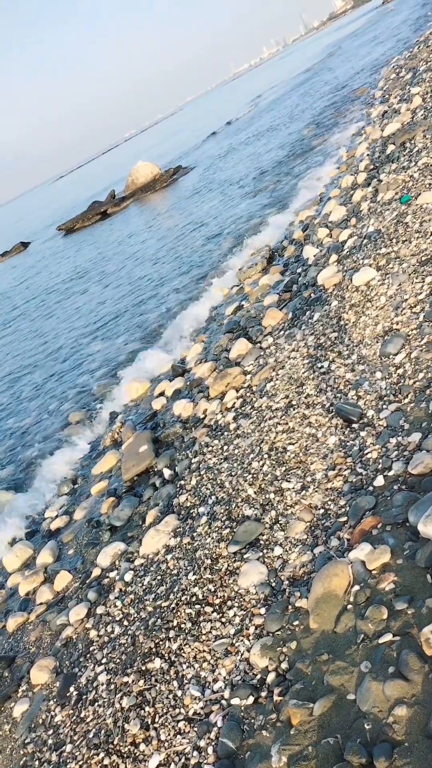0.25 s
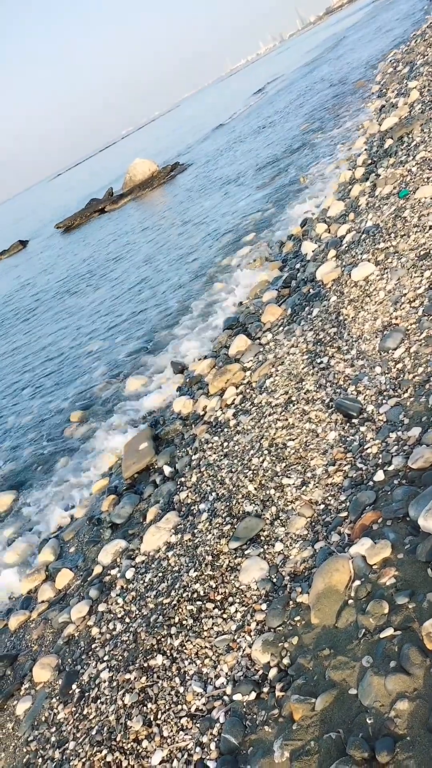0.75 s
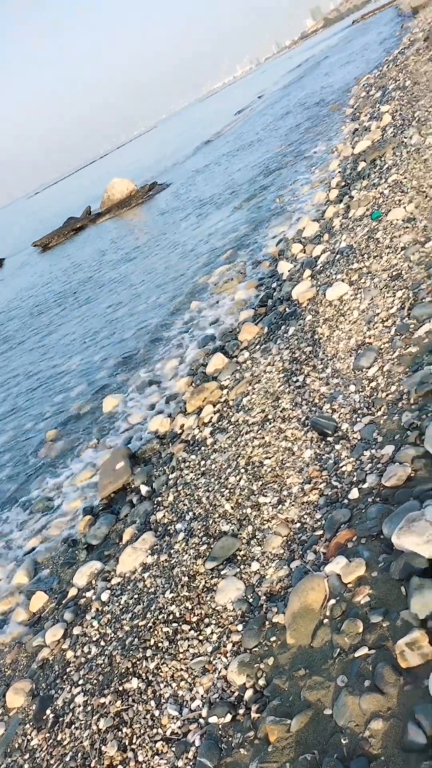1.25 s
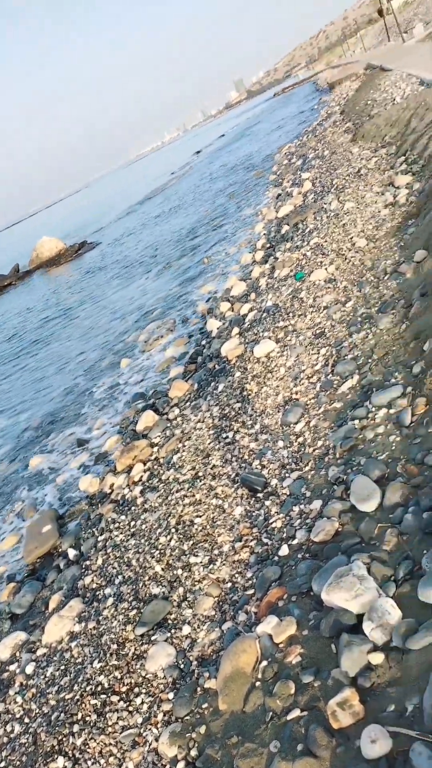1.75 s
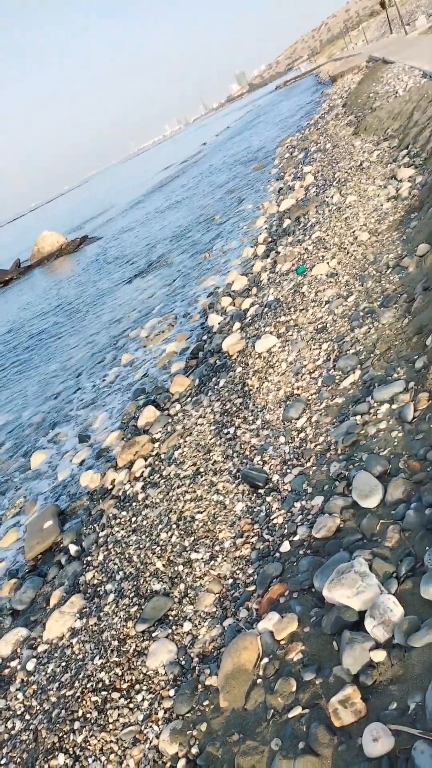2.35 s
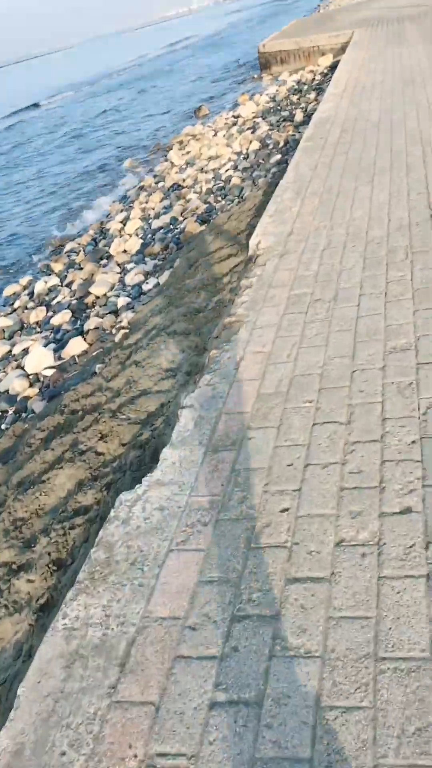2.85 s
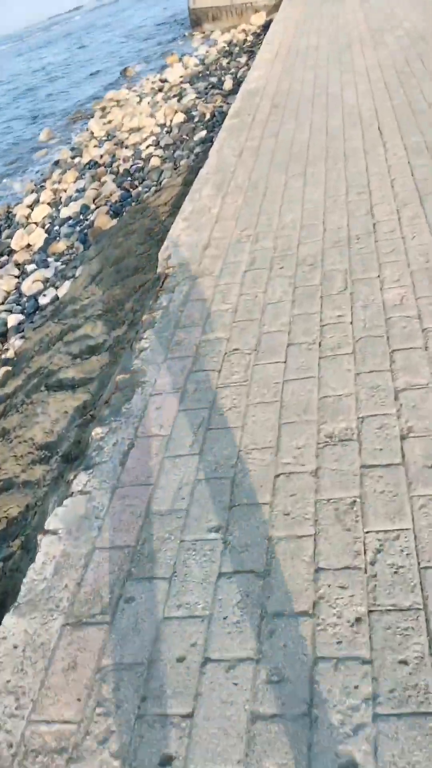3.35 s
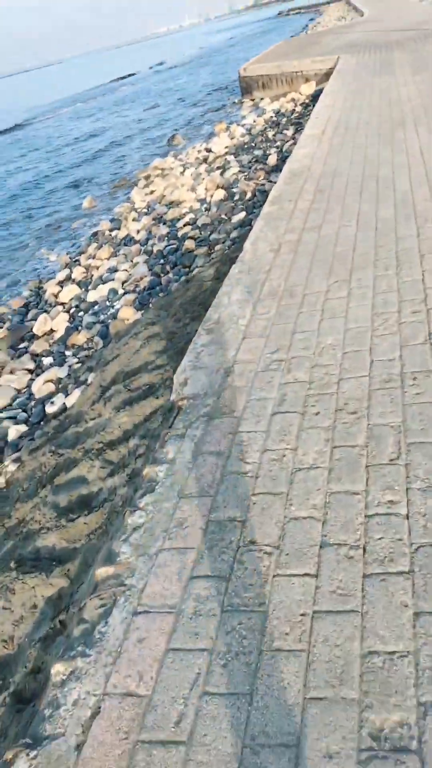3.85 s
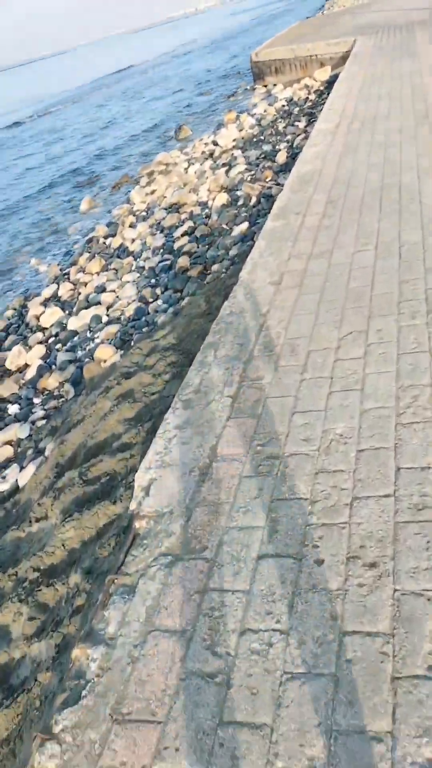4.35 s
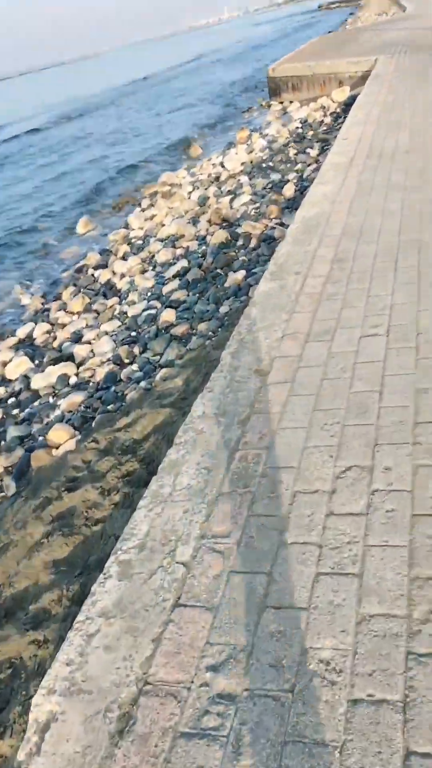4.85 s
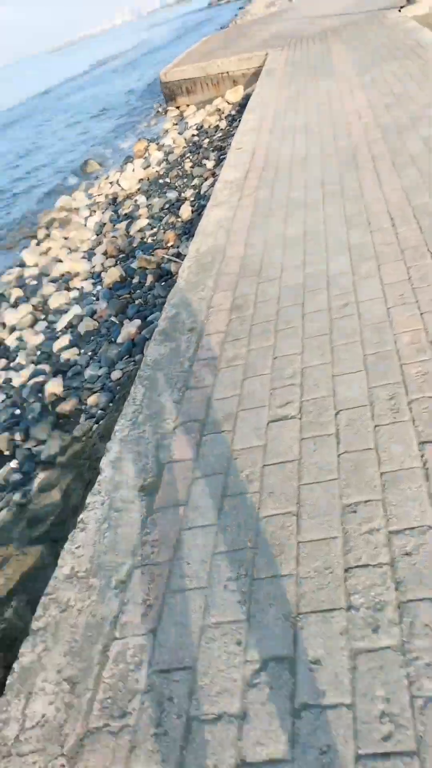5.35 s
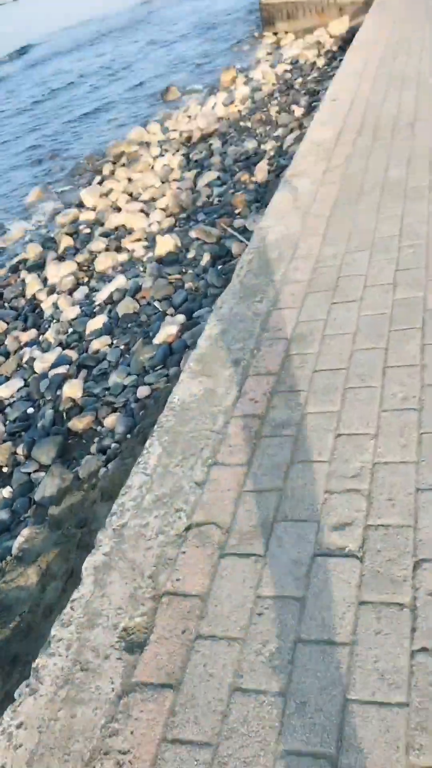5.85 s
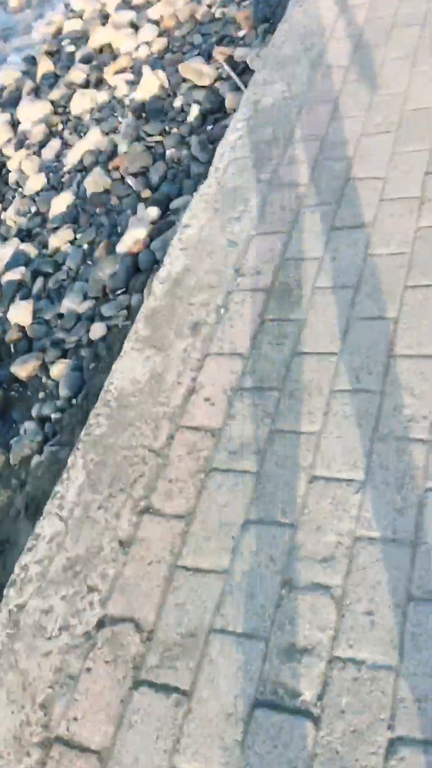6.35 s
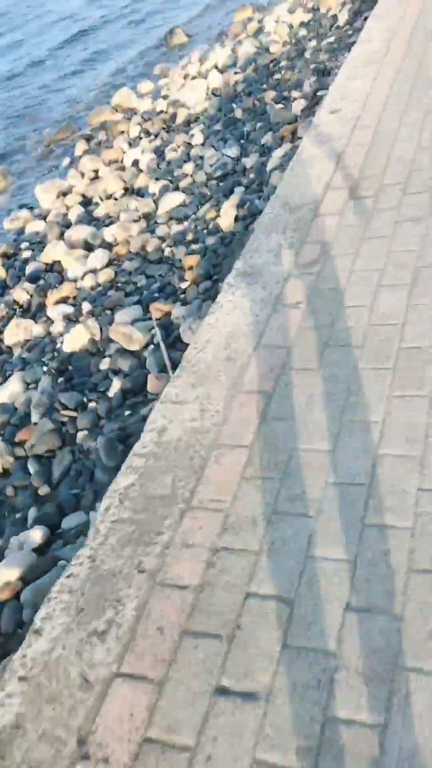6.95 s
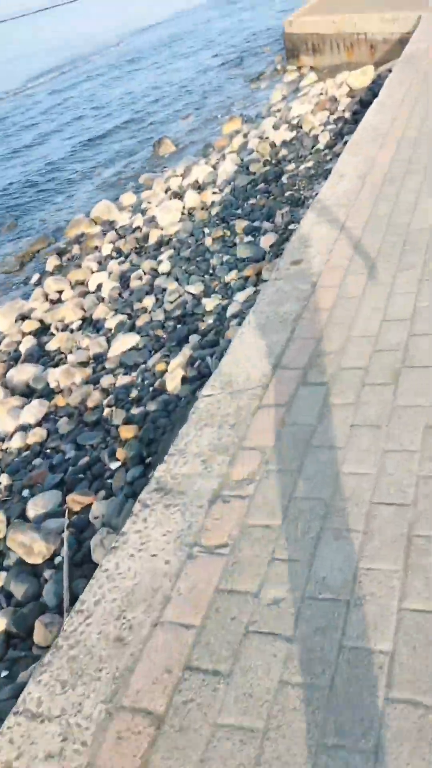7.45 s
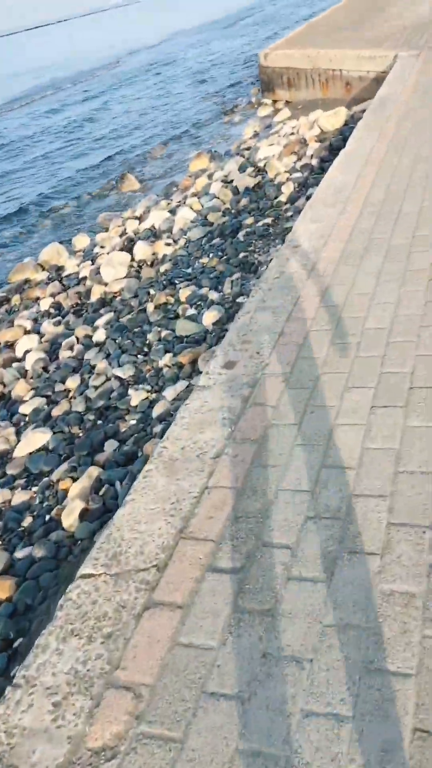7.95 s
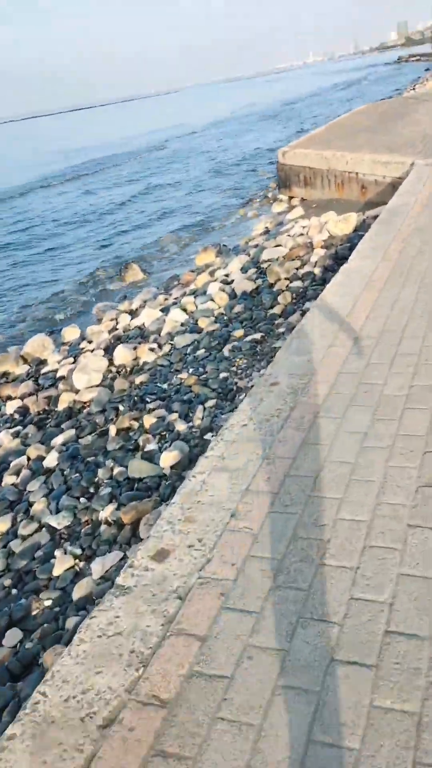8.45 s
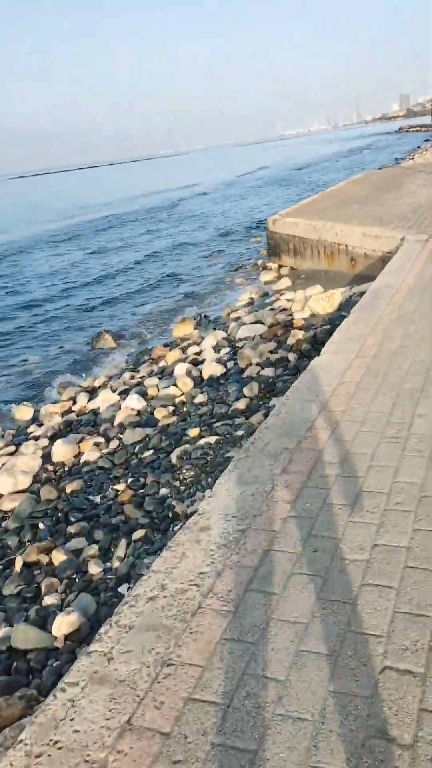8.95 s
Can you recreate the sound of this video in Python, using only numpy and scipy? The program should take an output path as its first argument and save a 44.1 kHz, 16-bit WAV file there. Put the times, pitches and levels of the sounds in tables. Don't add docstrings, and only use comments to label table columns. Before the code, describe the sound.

At 0 s a small wave breaks close by on pebbles, the loudest moment: wet slaps and hollow, rounded bubble tones tumble together under bright fizzing foam until about 0.7 s. It drains into thin trickling and isolated plops, almost quiet by 2 s. From 2.4 to 2.9 s there is abrupt total silence. Sound returns with a small gurgling wash, then light lapping, soft pebble knocks and sparse droplets from 3 to 5 s. Around 5.1 s bubbles pick up, and a fuller, moderate splash slaps and gurgles from 5.6 to 6.2 s. Faint dull footfalls come at 4.5, 6.0, 6.5, 7.4 and 8.5 s, with barely audible high metallic ticks, clearest near 7.1 s. Quiet lapping follows until 8.5 s, when bubbles, spray and slaps burst again, fading after 9.1 s. Low distant water rumble lies beneath; the pickup is dry, mono and open-air.

```python
import sys
import numpy as np
from scipy import signal
from scipy.fft import rfft, irfft, next_fast_len
from scipy.io import wavfile
from scipy.ndimage import uniform_filter1d, map_coordinates

SR = 44100
rng = np.random.default_rng(int(sys.argv[2]) if len(sys.argv) > 2 else 0)


def to_wav(sig):
    pcm = np.clip(np.atleast_2d(sig), -1, 1) * 32767
    pcm = np.round(pcm).astype(np.int16)
    wavfile.write(sys.argv[1], SR, pcm.T)


def ratio(d):
    e = np.asarray(d, float) / 20
    return 10 ** e


N = 405719

# start_s, level_db (peak), pitch_hz, life_cycles
FOOTFALLS = [
    (4.539, -45, 119, 1.7),
    (6.041, -48, 72.7, 2.3),
    (6.521, -40, 128, 2.4),
    (6.609, -40, 83.4, 1.7),
    (6.954, -48.5, 53.8, 1.5),
    (7.37, -45, 78.1, 2.1),
    (7.411, -40.5, 79.3, 2.9),
    (7.848, -50, 56.5, 1.7),
    (8.424, -38, 89.5, 2.1),
    (8.52, -37, 134, 5),
]
# start_s, level_db (peak), pitch_hz, fade_s (to -60 dB)
TAG_TICKS = [
    (0.5596, -61, 11670, 0.04),
    (4.5391, -59.5, 11650, 0.055),
    (4.5391, -70, 12330, .05),
    (5.5054, -58, 11660, 0.04),
    (6.534, -64, 10700, 0.04),
    (7.0815, -62, 15300, 0.04),
    (7.0863, -61, 8400, 0.03),
    (7.0863, -53, 13100, 0.03),
    (7.102, -65, 9700, .04),
    (8.9989, -58, 10300, 0.04),
]
# start_s, level_db (peak)
PEBBLE_KNOCKS = [
    (3.76, -48),
    (4.0785, -48),
    (4.2173, -46),
    (4.9136, -46),
    (7.1262, -40.5),
]
# start_s, level_db (peak)
DROPLET_BURSTS = [(3.2398, -47), (3.9242, -50), (4.912, -56), (5.3455, -52), (5.4947, -51), (5.5934, -48),
                  (5.9022, -42), (6.015, -42), (6.1761, -48), (6.894, -49), (7.547, -51), (7.6523, -52),
                  (8.627, -47), (8.6919, -41), (8.8141, -42), (8.909, -38)]
# start_s, length_s, pitch_hz, level_db
STREAMS = [(5.201, 0.17, 970, -48), (5.08, .1, 3000, -57), (6.42, .2, 877, -54), (6.1, .18, 950, -47.5),
           (8.38, .3, 4600, -59), (8.7, .28, 4650, -56), (2.93, .14, 2450, -47), (5.62, .1, 6450, -64),
           (6.1, .12, 5700, -63), (5.69, 0.24, 2500, -45), (5.72, 0.2, 1600, -49), (5.719, 0.1, 5460, -63),
           (6.05, 0.07, 1830, -50), (6.0, .12, 4000, -64), (5.982, 0.14, 5820, -59.5),
           (6.078, 0.12, 3950, -58), (5.86, .14, 588, -40.5), (7.518, 0.083, 1150, -55.5),
           (8.799, 0.15, 3950, -49), (5.7, .12, 6900, -63.5), (5.69, 0.11, 4050, -66),
           (6.03, .1, 2420, -59), (6.17, .12, 3750, -59.5), (8.85, .1, 2800, -49.5), (8.68, .2, 5800, -57),
           (6.04, 0.087, 2720, -52), (3.1, .1, 2250, -56), (3.09, .06, 1050, -50.5),
           (.24, .16, 3800, -43.5), (.05, .17, 3600, -36.5), (5.09, .3, 753, -52.5), (6.5, .07, 927, -52),
           (6.58, .11, 349, -50.5), (7.13, .13, 425, -52), (8.8, .1, 1150, -56.5), (.56, .1, 1500, -48.5)]
# start_s
# (7 ms before the crest), level_db (peak), pitch_hz
LONE_BUBBLES = [(0.384, -31.0, 280), (0.628, -40, 1120), (0.709, -41, 1010), (1.067, -49, 1060),
                (1.112, -49.0, 1080), (1.438, -52, 810), (1.533, -48, 300), (1.557, -55, 1290),
                (1.605, -53, 950), (1.691, -55, 960), (2.158, -54, 1250), (2.96, -36, 583), (3.04, -37, 970),
                (3.12, -44, 1080), (3.299, -46.0, 1160), (3.331, -42.0, 987), (3.521, -45.5, 790),
                (3.667, -45.0, 370), (3.894, -43.5, 220), (4.261, -41, 320), (5.101, -44.5, 340),
                (5.54, -45, 1240), (5.594, -40.5, 554), (5.696, -35, 780), (5.86, -33.0, 780),
                (6.037, -35.0, 800), (6.217, -39.5, 965), (6.468, -42, 340), (6.472, -45.0, 1270),
                (6.554, -39.0, 880), (6.646, -43, 300), (6.67, -46, 390), (6.827, -42, 800),
                (6.919, -48, 950), (7.019, -47.0, 990), (7.043, -48.0, 1160), (7.065, -50, 1140),
                (7.145, -45, 340), (7.209, -48.0, 1250), (7.414, -46, 1230), (8.117, -46.0, 1210),
                (8.216, -46.0, 220), (8.296, -45.0, 280), (8.326, -43.0, 1024), (8.407, -44, 1250),
                (8.558, -40, 500), (8.745, -32, 390), (8.883, -35.0, 1014), (8.913, -37, 560),
                (8.931, -36.0, 1020),
                (0.137, -30.0, 2200), (0.139, -28, 1490), (0.141, -32, 1870), (0.197, -37, 4310),
                  (0.27, -45, 6330), (0.292, -32, 1490), (0.298, -33.5, 3850), (0.364, -36.0, 2410),
                  (0.382, -39, 4090), (0.416, -37, 2130), (0.476, -42.0, 4240), (0.632, -44.0, 3940),
                  (1.194, -52.0, 3140), (2.322, -57.0, 3700), (2.394, -59, 2500), (2.918, -38.0, 2450),
                  (2.92, -41.0, 2970), (2.932, -51.0, 5170), (2.934, -51.0, 5450), (2.954, -41, 1920),
                  (2.96, -42.0, 2150), (2.972, -42.0, 3120), (2.972, -42, 1620), (2.976, -54.0, 6120),
                  (2.998, -39.0, 2930), (3.068, -39.0, 2520), (3.104, -40.0, 2730), (3.335, -59.0, 5510),
                  (3.455, -48.0, 2520), (3.93, -50, 1440), (5.303, -49.0, 2520), (5.62, -46, 1650),
                  (5.636, -56.0, 5990), (5.642, -55.0, 6440), (5.694, -53.0, 4760), (5.704, -45.0, 4050),
                  (5.758, -43.0, 3900), (6.139, -46, 4140), (6.199, -48.0, 4110), (6.353, -48, 1940),
                  (6.424, -51.0, 4110), (7.121, -50, 2090), (7.256, -49.0, 2890), (7.883, -65.0, 5810),
                  (8.158, -50.0, 2260), (8.552, -43, 2670), (8.655, -37.5, 1810), (8.657, -42.5, 3900),
                  (8.775, -39, 2520), (8.777, -37, 2070), (8.827, -39, 2020), (8.859, -48, 5920),
                  (8.905, -45.0, 4760), (8.913, -43, 3200), (8.969, -45.0, 4130)]
# start_s, level_db (peak), pitch_hz, life_cycles
WATER_SLAPS = [(.171, -16.5, 600, 2.5), (.145, -22, 1500, 2.7), (4.9135, -41, 1450, 9),
               (5.086, -36, 800, 5), (5.106, -39, 340, 3), (5.701, -30, 400, 3), (5.73, -23, 830, 5),
               (5.746, -31, 900, 3.3), (5.814, -28, 480, 4), (5.891, -24, 605, 3.7), (5.957, -27, 750, 4.3),
               (6.026, -32, 850, 3), (8.68, -31, 600, 3.4), (8.726, -31, 900, 2.3), (8.779, -29, 1500, 2.5),
               (8.793, -31, 500, 2.5), (8.915, -28, 1210, 2.5), (8.932, -29, 1400, 3),
               (8.999, -32, 700, 2.5), (9.038, -30, 600, 3), (3.936, -49, 1400, 5.5), (4.083, -49, 1600, 8)]
# start_s (7 ms before the crest), level_db
# (peak), pitch_hz
AIR_POCKETS = [(0.102, -20.5, 400), (0.108, -20.3, 620), (0.126, -24, 302), (0.132, -22.5, 667),
               (0.163, -21.5, 396), (0.226, -14, 528), (0.226, -15, 676), (0.329, -23, 570),
               (0.395, -29, 706), (1.623, -48.5, 678), (2.934, -37, 355), (2.958, -36, 570),
               (2.983, -32.6, 320), (2.985, -42, 624), (3.006, -32, 348), (3.026, -33, 322),
               (5.133, -37.5, 366), (5.27, -32.8, 216), (5.355, -37, 652), (5.684, -33, 330),
               (5.809, -29.5, 560), (5.887, -26, 557), (5.925, -27.5, 397), (5.94, -27, 686),
               (7.185, -39, 430), (7.417, -41.5, 150), (8.676, -26, 280), (8.691, -30.5, 559),
               (8.745, -31.3, 398), (8.774, -31, 370), (9.033, -34, 735),
               (0.058, -26, 1890), (0.09, -24.1, 1496), (0.11, -21, 910), (0.128, -28, 3746),
                 (0.134, -25, 1050), (0.139, -34, 2690), (0.218, -27.5, 3660), (2.934, -39, 3720),
                 (2.945, -40, 1410), (2.959, -32, 2540), (2.999, -45, 980), (3.039, -35, 968),
                 (4.909, -48, 1841), (4.911, -38.5, 1421), (5.083, -37, 840), (5.289, -32, 840),
                 (5.369, -36, 966), (5.635, -34, 3940), (5.727, -28.5, 830), (6.075, -40.5, 1765),
                 (6.099, -39, 1800), (6.554, -37, 893), (6.595, -39, 1410), (8.556, -28.5, 1754),
                 (8.571, -32, 1033), (8.634, -37, 2750), (8.808, -36, 3811), (8.868, -38, 4123),
                 (8.926, -33, 1730), (8.948, -32, 1020),
               (1.409, -45, 236), (4.263, -42, 336), (4.692, -42.5, 298), (5.135, -38.5, 980),
                (5.422, -38, 222), (5.652, -33, 835), (6.378, -38, 260), (6.466, -43, 345),
                (7.046, -39, 322), (7.223, -38.5, 980), (8.511, -32.5, 283), (.2, -25.5, 193),
                (.384, -34.5, 273)]
# start_s, hold_s, level_db, brightness_db_per_octave, extra_middle_ring_db
BREAKERS = [(0.019, 0.199, -32.0, 0.25, -0.5), (0.129, 0.04, -41.0, -1.24, -1),
            (0.326, 0.034, -36, -1.16, -3), (0.407, 0.023, -52.5, 1.0, 0.0), (0.526, 0.153, -49, 2, 2.5),
            (2.917, 0.093, -41, -0.55, -2), (3.03, 0.017, -43.0, 0.31, 2.3), (5.63, 0.022, -53.5, 1.0, 2.5),
            (5.7, 0.1, -46.5, 1.12, -3.6), (5.812, 0.011, -48, -4, -1.37), (5.898, 0.159, -44, -0.76, -4.0),
            (6.067, 0.049, -48.5, -0.5, -1.3), (6.211, 0.088, -51, 0.38, -1.74),
            (8.419, 0.004, -61.5, 4.5, 13.5), (8.569, 0.021, -47, 1.18, 8.5),
            (8.673, 0.024, -58.5, -1.56, -0.46), (8.732, 0.024, -52.5, -6, -6),
            (8.743, 0.043, -46, 1.69, 9.5), (8.902, 0.085, -43.5, -0.92, 4),
            (8.984, 0.007, -56, -0.68, 0.26), (9.022, 0.14, -53.5, -1.5, 6.5),
            (9.113, 0.025, -59, 1.12, -0.0)]
# start_s, hold_s, level_db, brightness_db_per_octave, extra_middle_ring_db
WAVELETS = [(0.729, 0.042, -49.5, -0.12, 4), (1.007, 0.015, -51.5, 0.65, -0.0),
            (1.391, 0.318, -69.5, 4, 2.5), (2.005, 0.247, -77.5, 7.5, -2), (2.364, 0.1, -59.5, -2.5, 3),
            (3.315, 0.005, -50, -1.0, -0.78), (3.542, 0.114, -57.5, -1.5, 4.0),
            (3.811, 0.174, -56, -2.5, -14.5), (4.248, 0.013, -51, -2.5, -22),
            (4.488, 0.313, -55.5, -0.79, -11), (4.907, 0.014, -58, 1.08, 3),
            (5.1, 0.294, -51.5, -1.64, -11.0), (5.527, 0.014, -56, -1.32, 4.5),
            (6.382, 0.221, -52, -1.61, 4.5), (6.601, 0.095, -65, 4.9, -1.9),
            (6.757, 0.139, -55.0, -1.17, 6.5), (7.18, 0.036, -52.5, -0.74, -0.6),
            (7.34, 0.066, -61, -0.9, 9), (7.531, 0.137, -55, -1.13, 6), (7.725, 0.04185, -64.5, -4.5, -6.9),
            (8.037, 0.015, -57.5, -1.08, 0.92), (8.167, 0.152, -55.0, -0.68, 9)]
# pitch_hz, lull_db, over_surge_db
WET_LAYERS = [
    (350.2, -61, -1.0),
    (800.7, -64.0, 0.0),
    (1505, -60.8, -5),
    (3203, -58.5, -0.6),
    (7010, -76.5, -14),
]

# pitch_hz, level_db
RUMBLE_COLOUR = [(12, -54.5), (20, -20.5), (86, -4.5), (230, -3), (300, -27.5), (510, -120)]
# pitch_hz, level_db
HOLLOW_COLOUR = [(110, -29.5), (180, -7.5), (269, 2.5), (508, 1.5), (559, -2.5), (600, -4.5), (780, -26),
                 (1320, -120)]
# pitch_hz, level_db
GURGLE_COLOUR = [(320, -30), (540, -2.5), (594, -2.5), (676, 0), (1040, -0.5), (1250, -17), (1620, -44),
                 (2750, -120)]
# pitch_hz, level_db
SPLASH_COLOUR = [(680, -26.5), (1150, 1), (1210, 0), (1500, -0.5), (1820, -4.5), (2250, -16), (2920, -25.5),
                 (4950, -120)]
# pitch_hz, level_db
FIZZ_COLOUR = [(1240, -21), (2100, -2.5), (2720, -1.5), (3780, -2.5), (4020, -3), (4580, -11.5),
               (5600, -14.5), (7280, -48.5), (12300, -120)]
# pitch_hz, level_db
SPRAY_COLOUR = [(3060, -25), (5200, -3), (5910, 0), (7030, -4.5), (7700, -10), (10900, -16.5), (11900, -17),
                (12800, -21), (14700, -20.5), (15500, -24.5)]
# pitch_hz, level_db
NEAR_COLOUR = [(30, -15), (90, -1), (1500, 2.5), (2050, -1), (2700, -1.5), (3700, 2), (4600, 0.2),
               (13000, 3.5)]
# pitch_hz,
# level_db
MIC_COLOUR = [(1650, -1.18), (2000, -2), (2300, -0.33), (11500, -1.53), (11900, 4.5), (12350, -1)]
# start_s, end_s
SILENCE = (2.4088, 2.9235)

RISE_DB_S, FALL_DB_S, DRAIN_DB, DRAIN_DB_S = 81, 97, -12, 26
LAP_RISE_DB_S, LAP_FALL_DB_S = 49, 42
RING_HZ, RING_OCTAVES = 1397.3, 0.7
SHELTER_DB, SHELTER_TILT = -1.09, -1.9
SWELL_DB, THUD_DB, THUD_GROWS, THUD_FALL_DB_S = -59, -6, 3.1, 67
POCKET_LIFE_S, LIFE_SLOPE, CREST_S = 0.01353, -0.27, 0.007


def unit(x):
    return x / np.sqrt(np.mean(x ** 2) + 1e-20)


def wobble(rate):
    knots = rng.standard_normal(int(N * rate / SR) + 4)
    return map_coordinates(knots, [np.arange(N) * rate / SR])


def patchy(patchy_db, size):
    z = signal.stft(rng.standard_normal(N + 512), nperseg=512)[2]
    field = uniform_filter1d(rng.standard_normal(z.shape), size[0], 0)
    field = uniform_filter1d(field, size[1], 1)
    return unit(signal.istft(z * ratio(patchy_db * unit(field)), nperseg=512)[1][:N])


def filtered(x, colour):
    m = next_fast_len(N + 8192)
    hz, db = np.transpose(colour)
    gain_db = np.interp(np.log(np.fft.rfftfreq(m, 1 / SR) + 1), np.log(hz + 1), db)
    return irfft(rfft(x, m) * ratio(gain_db), m)[:N]


def wash(x, colour, level_db):
    return ratio(level_db) * unit(filtered(x, colour))


def bubbles(s, peak, hz, cycles, rise, size):
    t = np.arange(size, dtype=np.float32) / SR
    peak, hz, cycles = np.float32(peak), np.float32(hz), np.float32(cycles)
    age = t * (hz / np.clip(cycles, 0.5, 200))[:, None]
    phase = 2 * np.pi * hz[:, None] * t * (1 + rise * np.minimum(age, 2) / 2)
    envelope = np.e * 3 * age * np.exp(-3 * age)
    wave = peak[:, None] * np.sin(phase) * envelope
    at = (s * SR).astype(int)[:, None] + np.arange(size)
    return np.bincount(at.ravel(), wave.ravel(), N + size)[:N]


def swarm(level_db, loud_db, count, mid_hz, spread, life_s, scatter_db, size):
    u, g = rng.random(count), rng.standard_normal((count, 2))
    e = rng.exponential(size=count)
    crowd = np.cumsum(1 / (1 + ratio(2 * (loud_db - level_db))))
    s = np.interp(u, crowd / crowd[-1], np.arange(N) / SR)
    hz = np.clip(mid_hz * np.exp(spread * g[:, 0]), 100, SR / 3)
    cycles = hz * life_s * np.exp(0.41 * g[:, 1])
    peak = ratio(scatter_db * np.minimum(e, 2.2))
    return unit(bubbles(s, peak, hz, cycles, 0.03, size=size))


def noise_bursts(rows, gain_db, fade_s):
    out, t = np.zeros(N + SR), np.arange(SR // 40) / SR
    for s, db in rows:
        burst = ratio(db + gain_db - 60 * t / fade_s) * rng.standard_normal(len(t))
        out[round(s * SR):][:len(t)] += burst
    return out[:N]


def far_swell(level_db):
    return wash(patchy(1.3, size=(2, 4)), RUMBLE_COLOUR, level_db + 1.7 * wobble(11.0))


def footfalls():
    s, db, hz, cycles = np.transpose(FOOTFALLS)
    push = bubbles(s, ratio(db - 1.0), hz, cycles, -0.058, size=6000)
    overtone = bubbles(s + 0.0123, ratio(db - 8), 1.65 * hz, 2.2 * cycles, -0.08, size=4000)
    return push + overtone


def tag_ticks():
    out, t = np.zeros(N + SR), np.arange(SR // 8) / SR
    for s, db, hz, fade_s in TAG_TICKS:
        main = np.sin(2 * np.pi * hz * t)
        partner = 0.25 * np.sin(2 * np.pi * 1.16 * hz * t) * ratio(-40 * t / fade_s)
        click = 0.3 * ratio(-60 * t / 0.008) * np.diff(rng.standard_normal(len(t) + 1))
        envelope = ratio(db + 1.5 - 60 * t / fade_s) * (1 - np.exp(-t / 0.0012))
        out[round(s * SR):][:len(t)] += envelope * (main + partner + click)
    return out[:N]


def pebble_knocks():
    cracks = noise_bursts(PEBBLE_KNOCKS, gain_db=7.0, fade_s=0.022)
    return filtered(cracks, [(500, -25), (1300, 4), (3000, 3.0), (9000, -50)])


def droplet_bursts():
    hiss = noise_bursts(DROPLET_BURSTS, gain_db=-2.5, fade_s=0.03)
    return filtered(hiss, [(2000, -25), (4500, 5), (6500, 2.0), (9000, -10), (15000, -26)])


def trickles():
    s, length_s, hz, db = np.transpose(STREAMS)[..., None]
    u, g = rng.random((len(s), 36)), rng.standard_normal((len(s), 36, 2))
    start_s = (s + length_s * u).ravel()
    bubble_hz = (hz + (35 + 0.01 * hz) * g[..., 0]).ravel()
    peak = ratio(db - 1.0 + 2.5 * g[..., 1]).ravel()
    return bubbles(start_s, peak, bubble_hz, 0.012 * bubble_hz, 0.005, size=1400)


def lone_bubbles():
    s, db, hz = np.transpose(LONE_BUBBLES)
    life_s = 0.012 * (hz / 1000) ** -0.2
    return bubbles(s + CREST_S - life_s / 3, ratio(db + 0.8), hz, hz * life_s, 0.015, size=2000)


def water_slaps():
    s, db, hz, cycles = np.transpose(WATER_SLAPS)
    return bubbles(s, ratio(db - 2.5), hz, cycles, 0.06, size=1000)


def air_pockets():
    s, db, hz = np.transpose(AIR_POCKETS)
    life_s = POCKET_LIFE_S * (hz / 1000) ** LIFE_SLOPE
    main = bubbles(s + CREST_S - life_s / 3, ratio(db - 3.0), hz, hz * life_s, 0.013, size=2500)
    g = rng.standard_normal((len(s), 3, 2))
    piece_hz = (hz[:, None] * 1.01 + 170 * g[..., 0]).clip(230).ravel()
    piece_s = (s[:, None] + 0.004 + 0.0043 * g[..., 1]).ravel()
    piece_peak = np.repeat(ratio(db - 14.5), 3)
    return main + bubbles(piece_s, piece_peak, piece_hz, 0.008 * piece_hz, 0.05, size=1000)


def foam(slosh, splash_db, fizz_db, spray_db):
    small = swarm(splash_db, -53, count=1400, mid_hz=1651, spread=0.25, life_s=0.01, scatter_db=3.5, size=1000)
    tiny = swarm(fizz_db, -52, count=3500, mid_hz=3289, spread=0.3, life_s=0.008, scatter_db=3.5, size=800)
    finest = swarm(spray_db, -64, count=4000, mid_hz=8030, spread=0.4, life_s=0.0042, scatter_db=4.0, size=500)
    pop_size = ratio(2.5 * np.minimum(rng.exponential(size=N), 4))
    pop_sign = np.sign(rng.random(N) - 0.5)
    crackle = unit(pop_size * pop_sign * (rng.random(N) < 0.0015))
    splash = patchy(1.0, size=(3, 12)) + 0.14 * small
    fizz = patchy(1.7, size=(3, 18)) + 0.18 * tiny + 0.099 * crackle
    spray = patchy(1.8, size=(4, 14)) + 0.21 * finest + 0.35 * crackle
    return (wash(splash, SPLASH_COLOUR, splash_db + 0.49 * slosh)
            + wash(fizz, FIZZ_COLOUR, fizz_db + 0.46 * slosh)
            + wash(spray, SPRAY_COLOUR, spray_db + 0.49 * slosh + 1.1 * wobble(28)))


def water_between_stones(slosh, hollow_db, gurgle_db):
    low = swarm(hollow_db, -48, count=700, mid_hz=340.0, spread=0.35, life_s=0.012, scatter_db=2.5, size=1200)
    middle = swarm(gurgle_db, -49, count=1200, mid_hz=815.6, spread=0.3045, life_s=0.011,
                   scatter_db=1.5, size=1100)
    hollow = patchy(1.5, size=(2, 5)) + 0.09 * low
    gurgle = patchy(2.6, size=(3, 6)) + 0.087 * middle
    return (wash(hollow, HOLLOW_COLOUR, hollow_db + 0.53 * slosh)
            + wash(gurgle, GURGLE_COLOUR, gurgle_db + 0.63 * slosh))


def rush(rows, t, rise_db_s, fall_db_s, drain_db):
    s, hold, db, tilt, ring_db = np.transpose(rows)[..., None]
    hz, _, over_db = np.transpose(WET_LAYERS)[..., None, None]
    octave = np.log2(hz / RING_HZ)
    after = np.maximum(t - s - hold, 0)
    middle_ring_db = ring_db * np.exp(-(octave / RING_OCTAVES) ** 2)
    top_db = db + over_db + tilt * octave + middle_ring_db
    top_db = top_db - rise_db_s * np.maximum(s - t, 0)
    collapse = ratio(2 * (top_db - fall_db_s * after))
    drain = ratio(2 * (top_db + drain_db - DRAIN_DB_S * after))
    return (collapse + drain).sum(1)


def surf_levels():
    t = np.arange(0, N, 200) / SR
    s, hold, db = np.transpose(BREAKERS)[:3, :, None]
    thud_db = db.max() + THUD_DB + THUD_GROWS * (db - db.max())
    thud_db = thud_db - RISE_DB_S * np.maximum(s - t, 0)
    thud_db = thud_db - THUD_FALL_DB_S * np.maximum(t - s - hold / 2, 0)
    rumble = ratio(2 * SWELL_DB) + ratio(2 * thud_db).sum(0)
    hz, lull_db, _ = np.transpose(WET_LAYERS)[..., None]
    shelter_db = SHELTER_DB + SHELTER_TILT * np.log2(hz / RING_HZ)
    lull = ratio(2 * (lull_db + shelter_db * (t < SILENCE[0])))
    breakers = rush(BREAKERS, t, RISE_DB_S, FALL_DB_S, DRAIN_DB)
    wavelets = rush(WAVELETS, t, LAP_RISE_DB_S, LAP_FALL_DB_S, -120)
    wet = lull + breakers + wavelets
    return [np.interp(np.arange(N) / SR, t, 10 * np.log10(power)) for power in [rumble, *wet]]


def scene():
    slosh = wobble(12)
    rumble_db, hollow_db, gurgle_db, *foam_db = surf_levels()
    dry_land = footfalls() + tag_ticks() + pebble_knocks() + droplet_bursts()
    ringing = trickles() + lone_bubbles() + water_slaps() + air_pockets()
    waves = foam(slosh, *foam_db) + water_between_stones(slosh, hollow_db, gurgle_db)
    return (far_swell(rumble_db) + dry_land + ringing + waves)[None]


def low_pass(x):
    return signal.sosfilt(signal.butter(12, 15640, fs=SR, output="sos"), x)


def record(dry):
    t = np.arange(N) / SR
    heard = filtered(dry[0], MIC_COLOUR)
    low_over_stones = filtered(heard, NEAR_COLOUR) * (t < SILENCE[0])
    further_back = heard * (t >= SILENCE[1])
    return low_pass((low_over_stones + further_back)[None])


dry = scene()
out = record(dry)
to_wav(out)
```